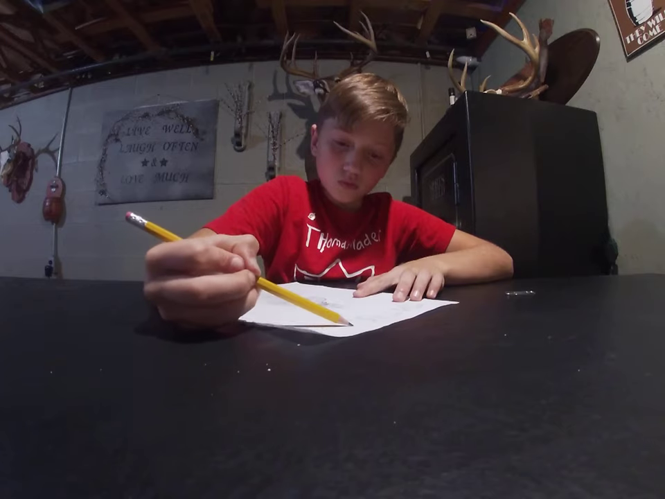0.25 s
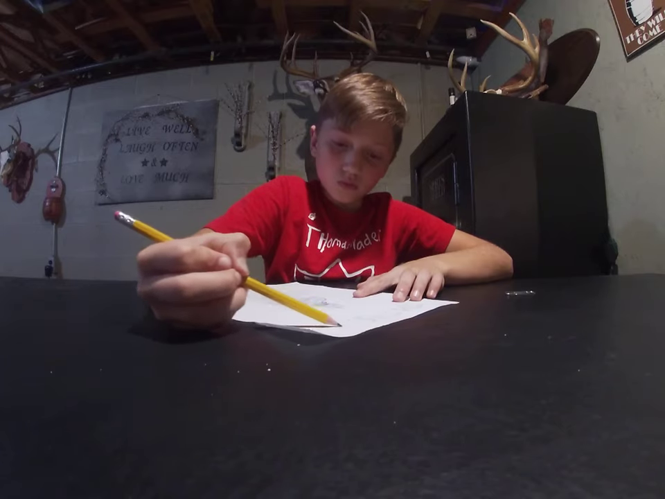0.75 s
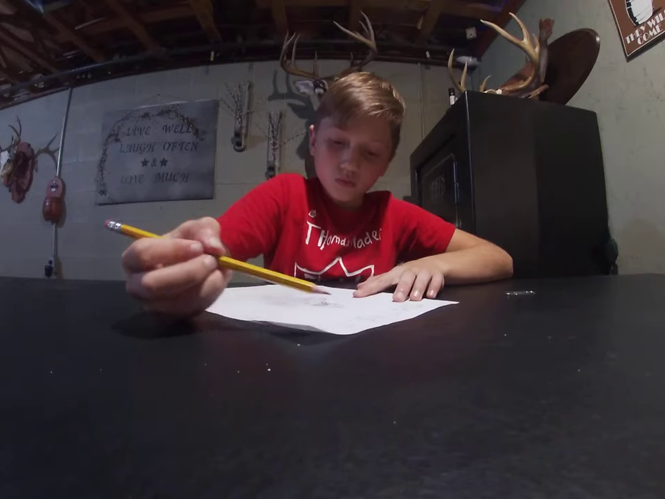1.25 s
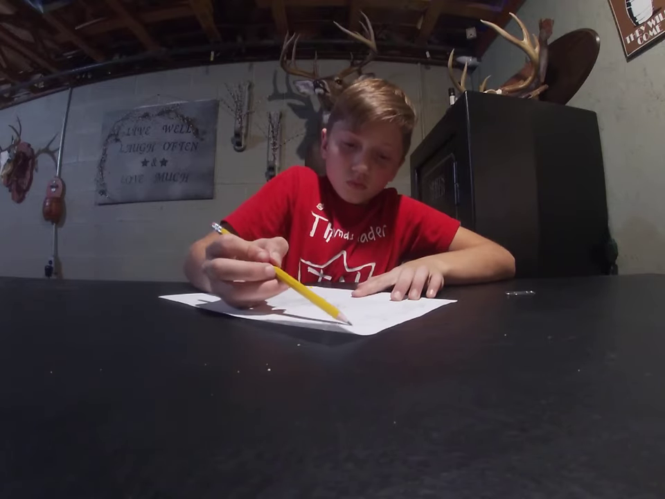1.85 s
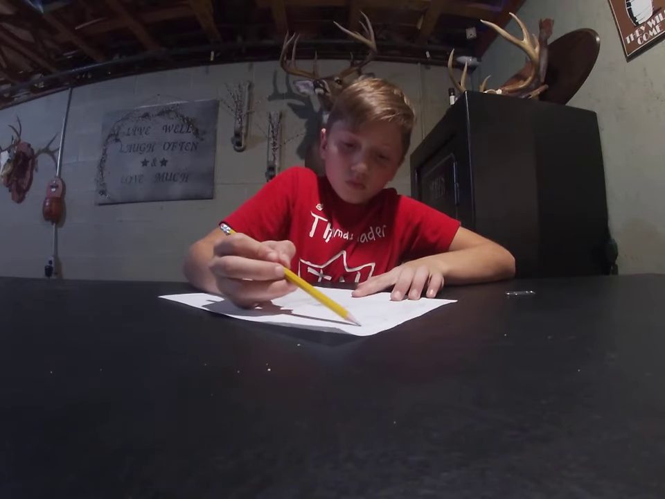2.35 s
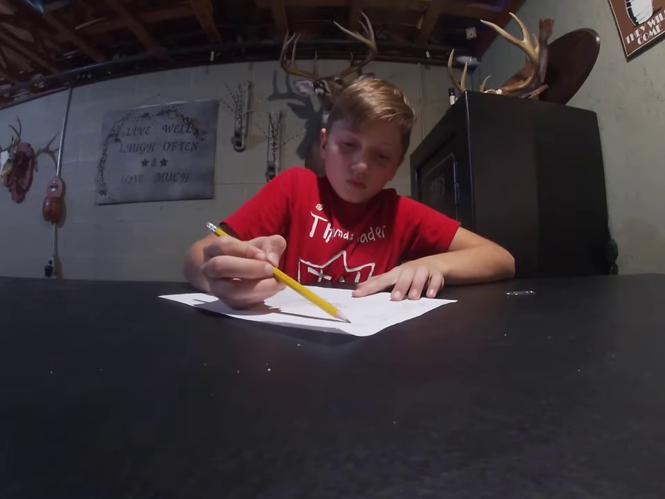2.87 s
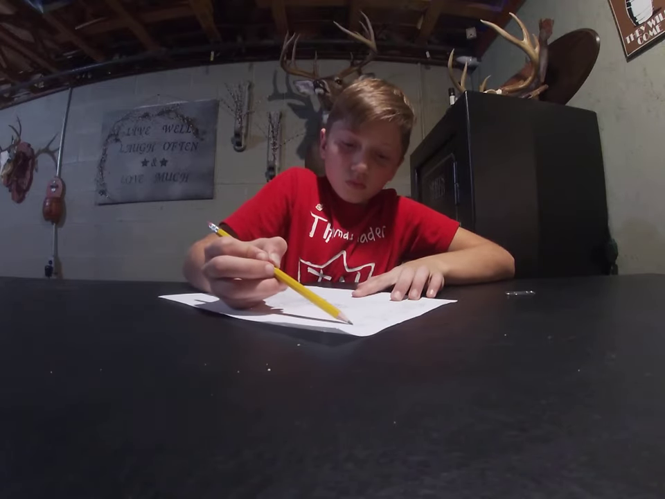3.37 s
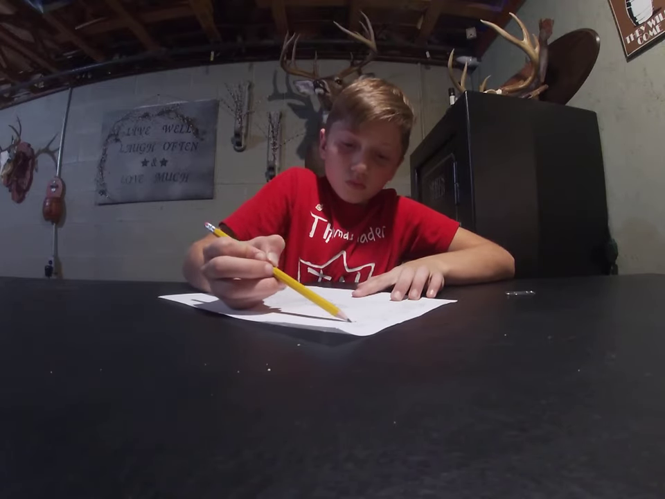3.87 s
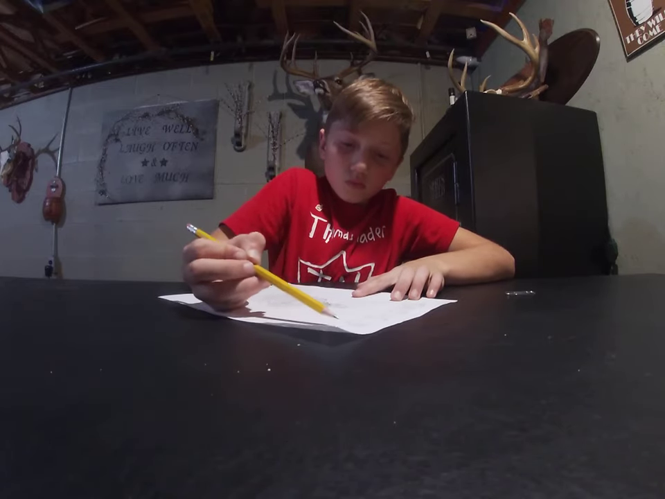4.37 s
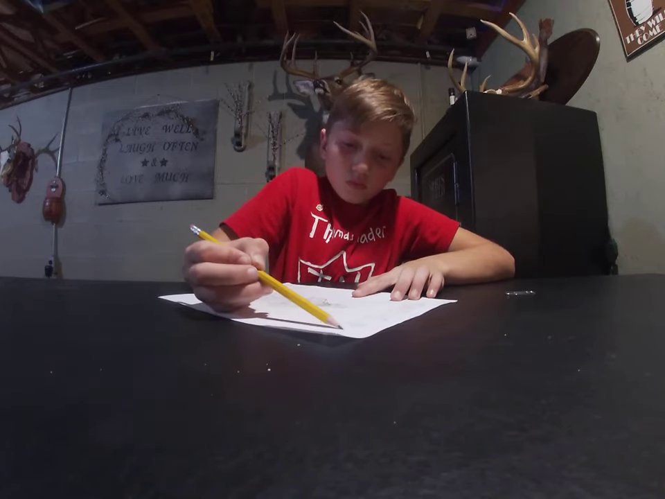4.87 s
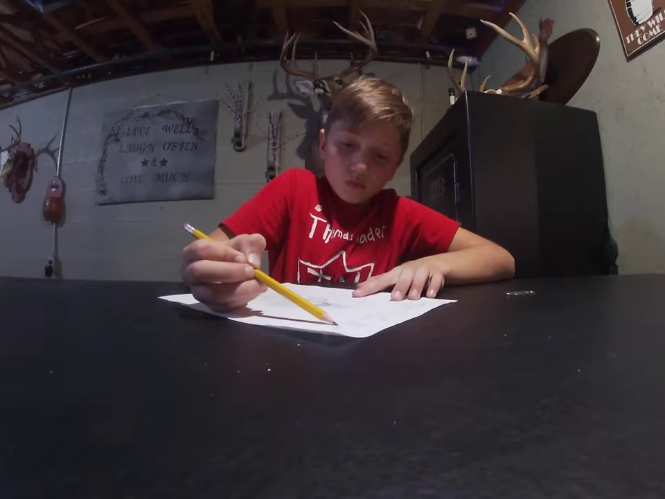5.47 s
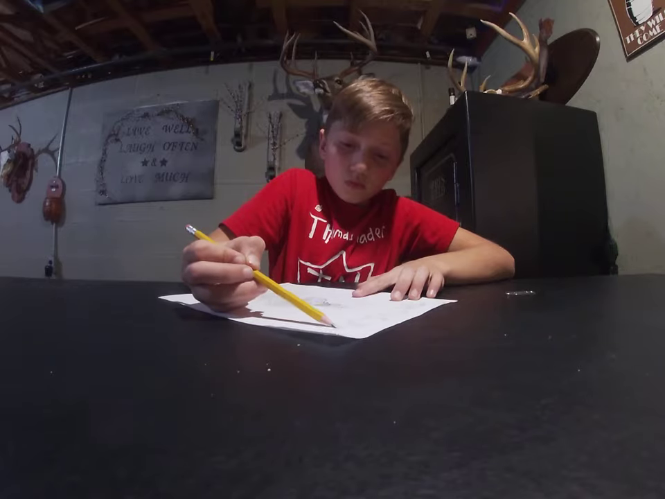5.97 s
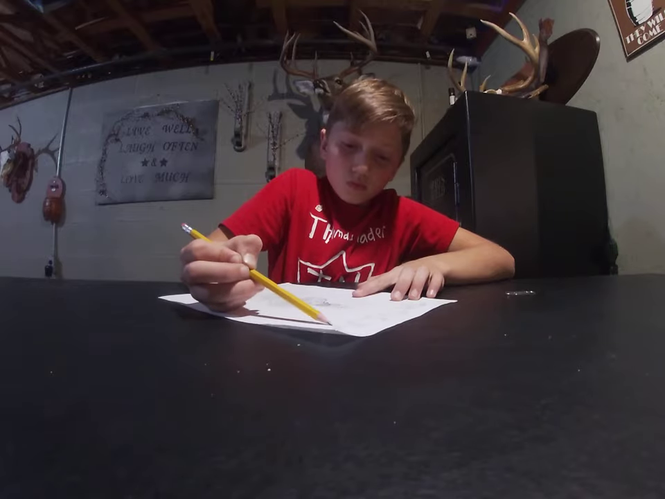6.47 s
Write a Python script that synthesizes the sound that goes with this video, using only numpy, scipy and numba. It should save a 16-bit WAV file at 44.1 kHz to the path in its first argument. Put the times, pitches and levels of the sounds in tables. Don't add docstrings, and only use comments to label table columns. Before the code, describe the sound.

Close to a small microphone on the same table, a pencil shades paper in short hissing strokes that make the table top ring faintly. The hand drags and turns the sheet, then quick strokes and slower ones follow. Dull floor thumps grow strongest near the middle, where a foot knocks the table frame. Shading resumes to the end over a low indoor hum.

```python
import sys
import numpy as np
from scipy import signal
from scipy.fft import rfft, irfft
from scipy.io import wavfile
from scipy.ndimage import uniform_filter1d
from numba import njit

SR = 44100
rng = np.random.default_rng(int(sys.argv[2]) if len(sys.argv) > 2 else 0)


def voltage_ratio(decibels):
    exponent = np.asarray(decibels, float) / 20
    return 10 ** exponent


def transcribe(u):
    v = np.clip(np.atleast_2d(u).T, -1, 1)
    q = np.round(v * 32767).astype(np.int16)
    wavfile.write(sys.argv[1], SR, q)


N = 296352
TIME = np.arange(N) / SR


def pencil():
    # centre in Hz, width in Hz, level in dB.
    graphite = [(4670, 1920, -2.5), (5840, 900, -2.5), (8400, 1600, -7)]
    paper = [(1710, 1400, 7), (2440, 1840, 10), (3570, 2120, 3)]
    table_top = [(1182, 244, 19), (1450, 390, -26)]
    # time in seconds, pitch in Hz.
    tip_pitch = [(0, 6170), (.6, 6740), (1.2, 6800), (1.4, 7100), (1.75, 6900), (2.0, 6900), (2.5, 7300),
                 (3.0, 7150), (3.7, 7030), (4.3, 6860), (4.75, 7040), (5.5, 7300), (6.72, 6850)]
    tip_width_hz, tip_db = 2440, 3.0
    hiss_gain, rustle_gain, fine_gain, ring_gain = strokes()

    contact = grit(spread_db=3.0, catch_db=1.35, catch_rate=55.)
    tip_hz = np.interp(TIME, *np.transpose(tip_pitch)) * (1 + 0.03 * walk(12.))
    tip = np.roll(contact, SR // 3)
    for _ in range(2):
        tip = glide(tip, tip_hz, tip_width_hz)
    grains = body(contact, graphite, order=2, patchy_db=2.2) + voltage_ratio(tip_db) * tip
    hiss = level(grains, -0.58) * hiss_gain
    rustle = level(body(contact, paper), -1.14) * rustle_gain
    fine = level(band(contact, 10200.0, 4600.0, order=2), 4.3) * fine_gain

    bumps = grit(spread_db=1.8, catch_db=1.76, catch_rate=90.)
    ring = level(body(bumps, table_top, order=2), -1.0) * ring_gain
    return hiss + rustle + fine + sheet_slides(contact), ring


def strokes():
    # fastest moment in seconds, speeding up in seconds,
    # slowing down in seconds, hiss level in dB, table ring level in dB.
    first_patch = [
        (.02, .05, 0.063, -72.5, -65.5),
        (.125, 0.044, 0.071, -71.5, -65),
        (.355, 0.032, 0.049, -71.5, -69),
        (.485, 0.093, 0.042, -66.5, -58.5),
        (.645, 0.11, 0.043, -64, -60.5),
        (.78, 0.11, 0.063, -65, -62),
        (.94, 0.11, 0.056, -65.5, -57),
        (1.05, 0.067, 0.063, -66, -60.5),
        (1.14, 0.07, 0.075, -74, -67),
    ]
    quick_patch = [
        (2.03, 0.063, 0.055, -69.5, -69),
        (2.12, 0.055, 0.053, -65.5, -65.5),
        (2.21, 0.043, 0.064, -62, -58.5),
        (2.29, 0.027, .05, -65.5, -67),
        (2.335, .05, 0.041, -64, -65),
        (2.41, .05, 0.043, -62.5, -60),
        (2.495, 0.046, 0.065, -65, -65),
        (2.75, 0.023, .05, -77.5, -76),
    ]
    slow_patch = [
        (2.95, 0.11, 0.25, -71, -63.5),
        (3.02, 0.066, 0.063, -66, -70),
        (3.27, 0.061, .06, -77, -69),
        (3.39, .09, 0.17, -68, -62.5),
        (3.7, 0.11, 0.19, -67, -64),
        (3.81, .05, 0.09, -75, -64.5),
        (4.0, 0.15, 0.095, -72, -67),
        (4.14, 0.15, 0.078, -67.5, -63),
    ]
    last_patch = [(4.32, 0.044, 0.1, -66.5, -68.5), (4.77, 0.068, .11, -64.5, -61.5),
                  (4.96, 0.083, 0.075, -65.5, -65), (5.16, 0.098, 0.13, -65, -63),
                  (5.35, 0.072, 0.11, -65, -64), (5.56, 0.064, .08, -63, -61),
                  (5.8, 0.017, 0.045, -79, -80), (5.92, .05, 0.086, -93, -70),
                  (6.11, .13, 0.087, -67, -61.5), (6.33, 0.12, 0.21, -79, -70),
                  (6.64, 0.087, .12, -72.5, -65)]
    # strokes, paper rustle and finest grain in dB over the hiss.
    passages = [(first_patch, -10, -17.5), (quick_patch, -11.5, -14),
                (slow_patch, -10.5, -14), (last_patch, -7.5, -15.5)]
    # time in seconds, effort in dB.
    drag = [
        (1.25, -94),
        (1.28, -68.5),
        (1.34, -67.5),
        (1.38, -63.5),
        (1.5, -64.5),
        (1.58, -64),
        (1.67, -66),
        (1.71, -74),
        (1.9, -101),
    ]
    drag_rustle_db, drag_fine_db = -5, -24
    drag_ring_db, ring_fade_db_per_s = 4, -33
    resting_rustle_db, resting_fine_db = -80, -93
    powers = np.array([[0.66], [0.58], [0.93], [0.47]])

    s, db = np.transpose(drag)
    effort = np.interp(TIME, s, voltage_ratio(db), left=0, right=0)
    fade = voltage_ratio(drag_ring_db + ring_fade_db_per_s * np.clip(TIME - s[0], 0, 1))
    drag_rustle = voltage_ratio(drag_rustle_db) * effort + voltage_ratio(resting_rustle_db)
    drag_fine = voltage_ratio(drag_fine_db) * effort + voltage_ratio(resting_fine_db)
    energy = np.array([effort, drag_rustle, drag_fine, fade * effort]) ** 2
    for rows, rustle_db, fine_db in passages:
        for s, rise, fall, db, ring_db in rows:
            near = slice(max(int((s - rise) * SR), 0), int((s + fall) * SR))
            speed = np.interp(TIME[near], [s - rise, s, s + fall], [0, 1, 0])
            peaks = voltage_ratio(np.array([[db], [db + rustle_db], [db + fine_db], [ring_db]]))
            energy[:, near] += (peaks * speed ** powers) ** 2
    return np.sqrt(energy)


def grit(spread_db, catch_db, catch_rate):
    unevenness = np.minimum(rng.exponential(size=N), 4)
    clicks = rng.standard_normal(N) * voltage_ratio(spread_db * unevenness)
    return clicks * voltage_ratio(catch_db * walk(catch_rate))


@njit
def glide(x, hz, width):
    out, band_state, low_state = np.empty(len(x)), 0., 0.
    for i in range(len(x)):
        g = np.tan(np.pi * hz[i] / SR)
        damping = width / hz[i]
        v = (band_state + g * (x[i] - low_state)) / (1 + g * (g + damping))
        band_state = 2 * v - band_state
        low_state = low_state + 2 * g * v
        out[i] = damping * v
    return out


def sheet_slides(contact):
    # start in seconds, length in seconds, hollow in Hz, width in Hz, level in dB.
    slides = [(1.493, 0.38, 1730, 490, -63.5), (1.513, 0.31, 2160, 900, -66.5),
              (1.33, .14, 2100, 1600, -68.5), (6.58, 0.16, 820, 78, -65.5), (6.5, 0.28, 1430, 900, -67),
              (.15, 0.26, 1460, 380, -74), (3.85, .3, 2400, 1200, -78), (5.1, .15, 2500, 1500, -79),
              (4.285, 0.14, 3000, 2100, -67.5), (3.3, 0.34, 1600, 1300, -71.5), (.1, 0.14, 2600, 2800, -72),
              (.775, 0.055, 2600, 2500, -70), (3.75, .14, 1760, 920, -69.5), (5.6, 0.16, 2400, 1600, -76)]
    friction = contact[::-1]
    out = np.zeros(N)
    for s, length, hz, width, db in slides:
        out += swish(s, length) * level(band(friction, hz, width, order=2), db)
    return out


def swish(start, length):
    skew = .62
    return np.sin(np.pi * np.clip((TIME - start) / length, 0, 1) ** skew) ** 2


def taps():
    # time in seconds, ring level in dB.
    landings = [(0.1082, -41), (0.789, -42), (0.8028, -35.5), (1.28, -41), (1.2915, -42.5), (1.441, -44.5),
                (1.5527, -51), (2.176, -52), (2.387, -49), (2.4064, -49), (2.9785, -48), (4.297, -35)]
    # time in seconds, level in dB,
    # centre in Hz.
    ticks = [(.0003, -51, 8000), (0.108, -51, 5000), (.3311, -65, 6000), (.8022, -47, 5000),
             (1.26, -57, 5000), (1.975, -58, 6040), (2.7362, -60, 6000), (4.297, -49, 4200),
             (4.6424, -57, 9900), (4.652, -55, 7600), (5.789, -55, 7950)]
    knock, click = np.zeros(N), np.zeros(N)
    for s, ring_db in landings:
        knock[int(s * SR)] += voltage_ratio(ring_db + 35.5)
    for s, db, hz in ticks:
        tick = band(signal.unit_impulse(200), hz, 5500., order=2)
        click[int(s * SR):][:200] += voltage_ratio(db + 15.) * tick
    return click, band(knock, 1184.0, 320.0, order=3)


def thumps():
    # deepest trough in seconds, level in dB, pitch in Hz,
    # rise in seconds, fall in seconds.
    sways = [(0.723, -41.5, 27, .025, 0.061), (1.504, -41.5, 27, 0.047, 0.038),
             (1.87, -43.5, 23, 0.033, 0.055), (2.402, -35, 25, .04, 0.042),
             (2.927, -28.5, 21.5, 0.031, 0.042), (3.287, -32, 29, 0.035, 0.08),
             (3.411, -41.5, 25, 0.033, 0.065), (3.89, -21, 26, 0.052, 0.042),
             (3.972, -31.5, 31, 0.02, 0.04), (4.42, -34, 22.4, 0.014, 0.068),
             (4.525, -34, 23.5, 0.042, 0.017), (4.64, -43, 27, 0.06, 0.016),
             (5.249, -26.5, 21.5, 0.047, 0.088), (5.367, -29.5, 25, 0.059, 0.061),
             (5.728, -35.5, 19.5, 0.015, 0.08), (5.889, -36, 23, 0.04, 0.053)]
    jolts = [
        (.76, -61, 104, .06, 0.056),
        (3.779, -32, 62, 0.0038, 0.021),
        (3.847, -29.5, 51, 0.0086, 0.007),
        (3.866, -37.5, 69.3, .05, 0.1),
        (3.951, -56, 102.4, 0.08, 0.039),
    ]
    # deepest trough in seconds, level in dB, pitch in Hz.
    fidgets = [(.832, -56, 45), (1.1, -57, 35), (1.205, -57, 22), (1.72, -53, 20), (2.628, -48, 27),
               (3.048, -44.5, 36), (3.189, -47, 28), (4.058, -51, 57), (4.81, -55, 27), (5.58, -50, 18),
               (6.051, -49, 25), (6.212, -48, 23), (6.32, -55, 22), (6.66, -57, 38)]
    fidget_rise_s, fidget_fall_s = .028, 0.04
    small = [(*row, fidget_rise_s, fidget_fall_s) for row in fidgets]
    out = np.zeros(N)
    for s, db, hz, rise, fall in sways + jolts + small:
        near = slice(max(int(s * SR) - SR // 2, 0), int(s * SR) + SR // 2)
        t = TIME[near] - s
        swell = np.exp(-(t / np.where(t < 0, rise, fall)) ** 2)
        out[near] -= voltage_ratio(db) * np.cos(2 * np.pi * hz * t) * swell
    return out


def creaks():
    # start in seconds, length in seconds, first pitch in Hz, last pitch in Hz, level in dB,
    # octave in dB over the tone.
    groans = [
        (0.101, 0.18, 268.7, 315, -54, -17),
        (0.19, 0.19, 290, 274, -57, -37),
        (4.44, 0.28, 760, 745, -67.5, -26),
        (4.739, 0.214, 820, 778, -73, -28),
    ]
    out = np.zeros(N)
    for s, length, from_hz, to_hz, db, octave_db in groans:
        hz = np.interp(TIME, [s, s + length], [from_hz, to_hz]) * (1 + 0.015 * walk(30.))
        phase = 2 * np.pi * np.cumsum(hz) / SR
        tone = np.sin(phase) + voltage_ratio(octave_db) * np.sin(2 * phase)
        out += voltage_ratio(db + 3.0 + 1.5 * walk(30.)) * arch(s, length) * tone
    return out


def arch(start, length):
    return np.sin(np.pi * np.clip((TIME - start) / length, 0, 1)) ** 2


def room():
    # pitch in Hz, level in dB.
    hum = [(147.7, -57), (196.3, -53.5), (395.8, -72.5), (58.9, -70.5), (118.8, -79), (480.3, -67.5)]
    # centre in Hz, width in Hz, level in dB.
    cabinet = [(152.1, 26, -64.5), (197.2, 24, -67.5), (216.1, 12.7, -61), (233.6, 18.2, -60.5),
               (413, 82, -65.5), (302, 56, -72), (500.4, 89, -72)]
    # frequency in Hz, level in dB per Hz.
    air_colour = [(12, -46), (20, -4.5), (49, -19), (91, -19), (127, -18), (201, -5), (310, -16),
                  (479, -16.5), (549, -27.5), (646, -22.5), (1210, -31.5), (2320, -44), (7050, -39.5),
                  (10900, -55.5), (13200, -84)]
    out = np.zeros(N)
    for hz, db in hum:
        line = np.sin(2 * np.pi * (hz * TIME + rng.random()))
        out += np.sqrt(2) * voltage_ratio(db + 0.25 * walk(3.01)) * line
    for hz, width, db in cabinet:
        out += level(band(rng.standard_normal(N), hz, width, order=2), db)
    hz, db = np.transpose(air_colour)
    colour = voltage_ratio(np.interp(np.log(np.fft.rfftfreq(N, 1 / SR) + 1), np.log(hz), db))
    air = irfft(rfft(rng.standard_normal(N)) * colour, N)
    return out + level(air, -59)


def level(x, db):
    return x * voltage_ratio(db) / np.sqrt(np.mean(x ** 2))


def band(x, hz, width, order=1):
    for _ in range(order):
        x = signal.lfilter(*signal.iirpeak(hz, hz / width, fs=SR), x)
    return x


def body(x, modes, order=1, patchy_db=0.):
    out = 0
    for k, (hz, width, db) in enumerate(modes):
        gain = voltage_ratio(db + patchy_db * walk(14.))
        out = out + (-1) ** k * gain * band(x, hz, width, order=order)
    return out


def walk(rate):
    k = int(SR / rate)
    return uniform_filter1d(np.repeat(rng.standard_normal(N // k + 1), k), k)[:N]


def step_down(x, hz, db):
    low = signal.sosfiltfilt(signal.butter(10, hz, fs=SR, output="sos"), x)
    return low + voltage_ratio(db) * (x - low)


def top_gate(x):
    edge_hz, shut_share, window_s = 12650, .92, .03
    top = x - signal.sosfiltfilt(signal.ellip(8, .1, 60, edge_hz, fs=SR, output="sos"), x)
    high = signal.sosfiltfilt(signal.butter(6, edge_hz, "high", fs=SR, output="sos"), top)
    power = uniform_filter1d(high ** 2, int(window_s * SR))
    shut = uniform_filter1d(1. * (power < np.quantile(power, shut_share)), SR // 100)
    return x - shut * top


def scene():
    ceiling_s, ceiling_db = .00744, -7
    scratch, ring = pencil()
    click, knock = taps()
    airborne = scratch + click
    echo = np.roll(band(airborne, 7500., 2870.0), int(ceiling_s * SR))
    mix = airborne + voltage_ratio(ceiling_db) * echo + ring + knock + thumps() + creaks() + room()
    return mix[None]


def roll_off(x):
    return signal.sosfilt(signal.butter(12, 13310, fs=SR, output="sos"), x)


def record(dry):
    # edge in Hz, level above it in dB.
    mic_steps = [(8800, -3.5), (11600, -5.5)]
    mic = dry
    for hz, db in mic_steps:
        mic = step_down(mic, hz, db)
    mic = mic + level(band(rng.standard_normal(N), 12400.0, 4400.0, order=2), -97)
    mic = top_gate(step_down(mic, 13300, -1))
    return roll_off(mic)


dry = scene()
out = record(dry)
transcribe(out)
```